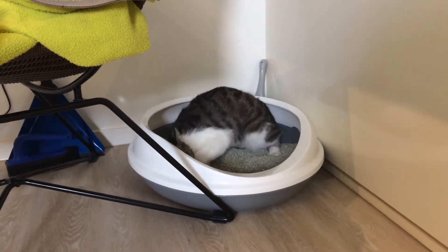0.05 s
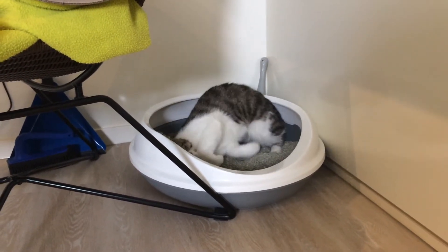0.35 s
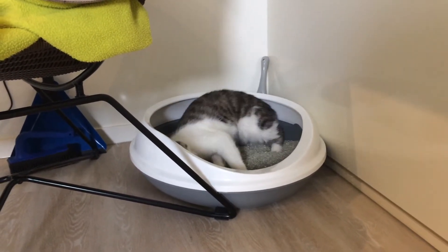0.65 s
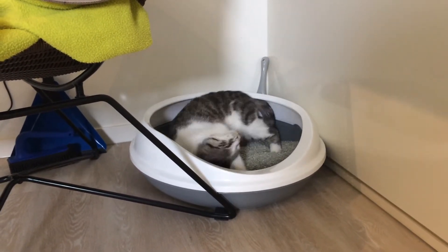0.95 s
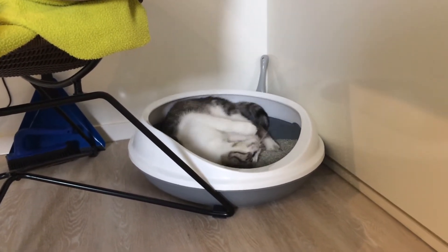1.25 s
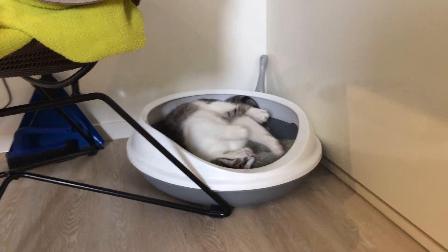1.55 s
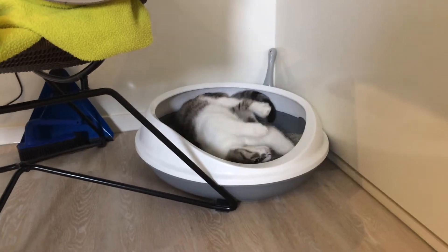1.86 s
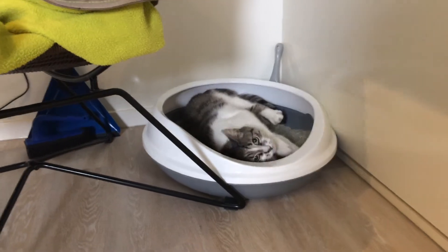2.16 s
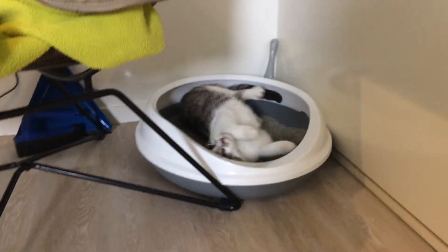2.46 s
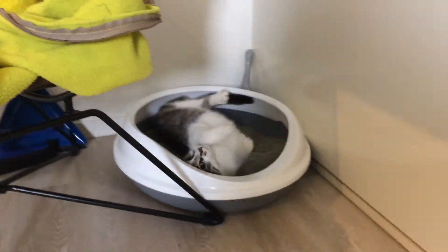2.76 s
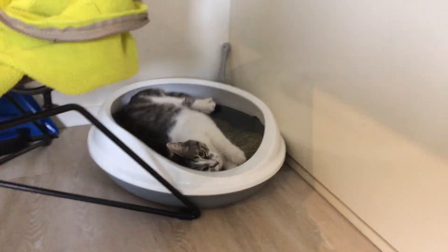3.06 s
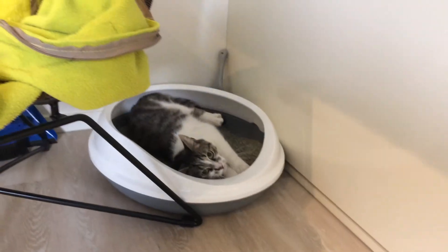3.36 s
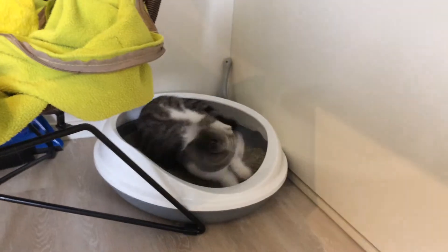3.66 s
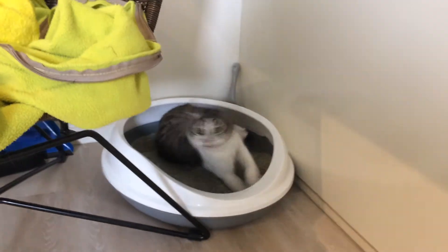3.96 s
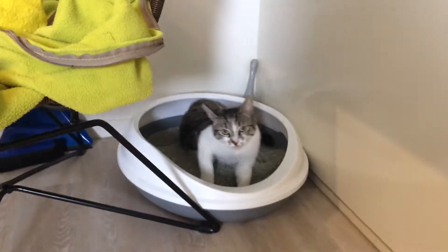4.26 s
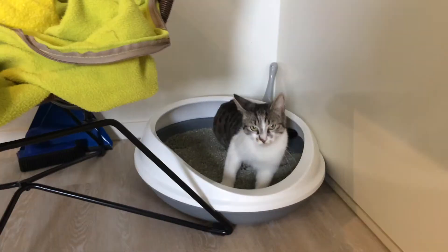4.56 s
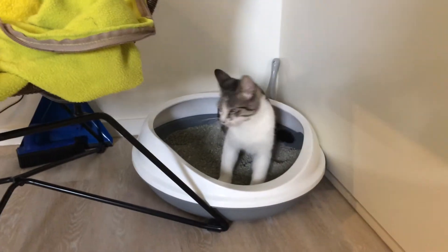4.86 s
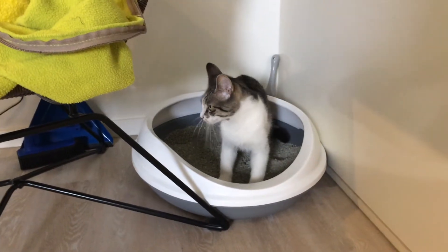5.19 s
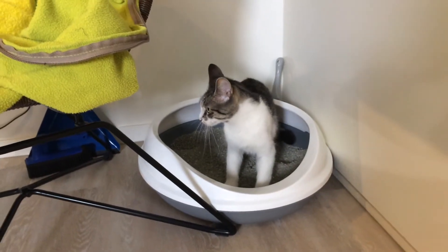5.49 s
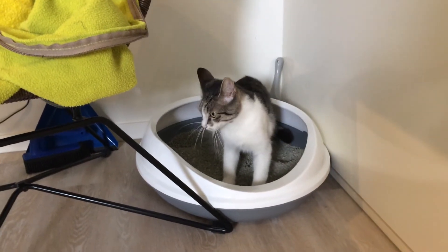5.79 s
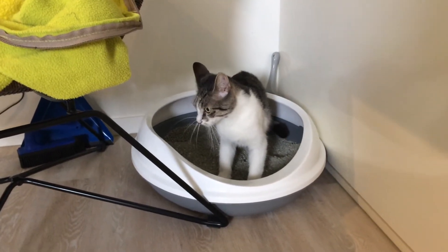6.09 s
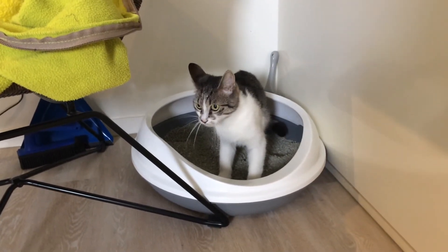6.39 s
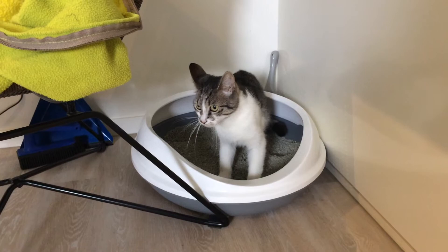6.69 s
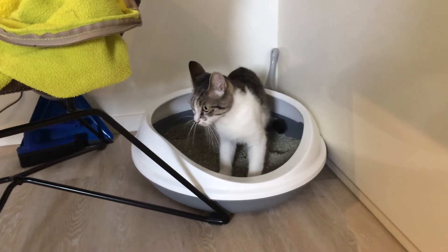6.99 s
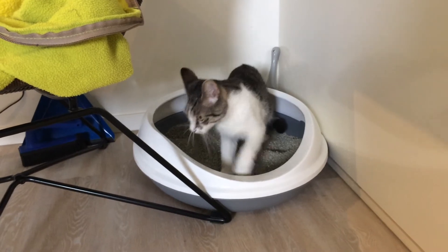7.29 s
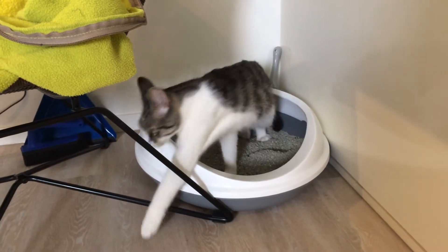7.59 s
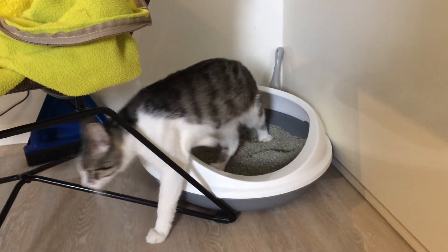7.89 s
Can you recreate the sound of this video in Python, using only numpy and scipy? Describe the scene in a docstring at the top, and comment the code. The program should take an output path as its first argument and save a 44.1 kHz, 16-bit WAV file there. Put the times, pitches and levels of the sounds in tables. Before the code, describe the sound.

A cat moves in a plastic litter tray in a quiet room with a short echo and a faint low rumble. From about 0.2 to 0.6 seconds, granules crunch and spray brightly, with paw scuffs and two sharp ticks on the plastic. Softer, uneven rustling and scattered ticks follow as the cat rolls about. Around 2.5 seconds the tray rocks against the floor with low, hollow thumps. A short scrape and a sharp tick come at 3.2 seconds. The heaviest thumps fall near 3.8 seconds, followed by strong gritty scraping and a softer bump, fading by about 5 seconds. The room is then almost still, with a few very faint, thin twitters like a distant bird between 5 and 7 seconds, and tiny pings near 5.3 and 7.2 seconds. From 7.4 to 8 seconds the cat steps out with light crunches, scuffs, ticks and faint bumps.

```python
"""A cat rolls about in a plastic litter tray in a quiet room, sits up, waits and steps out.
Each push grinds granules under its body and sprays them off its paws; a few flick against the plastic.
Paws scuff and claws tick on the tray, and the cat's weight rocks it so that it thumps on the floor.
Behind this are a few faint pings, thin high twitters, a short echo and the room's low rumble."""
import sys
import numpy as np
from scipy import signal
from scipy.fft import rfft, irfft, next_fast_len
from scipy.io import wavfile

SR = 44100
rng = np.random.default_rng(int(sys.argv[2]) if len(sys.argv) > 2 else 0)


def store_wav(level_fs):
    """Save 16-bit WAV to argv[1]."""
    pcm = np.round(np.clip(np.atleast_2d(level_fs), -1, 1) * 32767)
    wavfile.write(sys.argv[1], SR, pcm.T.astype(np.int16))


N = 350154
TIME = np.arange(N) / SR


def litter():
    """Granules grind and spray in small slips; harder pushes make more collisions and sound the tray."""
    # The tone of each part of the rustle. Each row: pitch in Hz, relative level in dB.
    grind_tone = [(300, -17), (700, -18.5), (1050, -16), (1400, -8), (1900, -3), (3000, -3.5), (5000, -5.5),
                  (6500, -10), (9000, -20.5), (15000, -35)]
    spray_tone = [(1500, -12), (3500, -3.5), (6000, -1), (7500, -3), (10000, -5.5), (13000, -8.5),
                  (15500, -11.5)]
    press_tone = [(60, -4.5), (130, -2.5), (200, -10), (280, -5), (400, 1), (560, -2.5), (800, -4),
                  (1050, -6.5), (1500, -9.5), (2500, -10.5), (6000, -30.5)]
    grind_db, spray_db, press_db = 10 * np.log10(cat_pushes())
    usual_grind_db = -58
    slips = from_db(0.43 * drift(rate=88))
    collisions = grains(per_s=7000 * from_db(0.55 * (grind_db - usual_grind_db)), spread_db=3.0)
    crunch = rng.standard_normal((3, N)) * collisions
    grind = from_db(0.3) * coloured(crunch[0], grind_tone)
    grind += from_db(-8) * clinks(per_s=450, spread_db=3.5, cycles=32)
    spray = from_db(spray_db + 5.0) * coloured(crunch[1], spray_tone)
    press = from_db(press_db - 1.53 + 2.0 * drift(rate=25)) * coloured(crunch[2], press_tone)
    return slips * (from_db(grind_db) * grind + spray + press) + flung_granules(spray_db)


def cat_pushes():
    """The power of grinding, spray and pressure on the tray: each push swells and fades."""
    # Pushes of a paw or flank. Each row: peak time, rise and fall in seconds, grinding level in dB,
    # then spray and pressure in dB compared with the grinding.
    pushes = [(0.219, 0.073, .077, -42.5, -10, -8), (0.295, 0.027, 0.033, -53, -12, 9),
              (0.35, 0.0039, 0.051, -39, -6, -10), (0.381, 0.027, 0.08, -46, 7.5, 1),
              (0.45, 0.019, 0.11, -41, 2.5, -7.5), (0.755, 0.032, 0.17, -61.5, -9.5, 4.5),
              (1.0, 0.12, 0.14, -63.5, -12, 7), (1.13, 0.12, 0.072, -62, -2, -1),
              (1.392, 0.091, 0.043, -54, -4.5, 2.5), (1.59, 0.11, 0.097, -52, -9.5, -1.5),
              (1.855, 0.057, 0.3, -55, -6, -1.5), (2.005, 0.057, 0.052, -52.5, -8.5, -8),
              (2.47, 0.032, 0.081, -61.5, -14, 3.5), (2.575, 0.06, 0.059, -59, -8, -1),
              (2.944, 0.079, 0.08, -61, -8, 0), (3.146, 0.043, .05, -47.5, -17, -3.5),
              (3.184, 0.063, 0.083, -54.5, 5.5, -0.5), (3.695, 0.042, 0.25, -65.5, -7.5, 4),
              (3.845, 0.055, 0.037, -53, -7.5, -1.5), (3.93, 0.016, 0.069, -41, 0, -4.5),
              (4.055, 0.065, 0.051, -45.5, -2, -5.5), (4.212, 0.073, 0.048, -45, -12, -3.5),
              (4.248, 0.06, 0.058, -48, -13.5, -1), (4.527, 0.095, 0.043, -55, -9, 7.5),
              (4.59, 0.47, 0.14, -65.5, -9, 7.5), (5.095, 0.15, 0.12, -75.5, -25, 6),
              (7.39, 0.038, .06, -76, -5, 6.5), (7.56, 0.092, 0.19, -66, -26, 3),
              (7.64, 0.032, 0.21, -71.5, -6, 10.5), (7.882, 0.016, 0.03, -59.5, -25, -3)]
    # While the cat lies wriggling, its weight keeps the litter creeping.
    wriggle_db, wriggle_end_s, fade_s = -69.5, 2.95, 0.34
    wriggle = from_db(wriggle_db) * np.clip((wriggle_end_s - TIME) / fade_s, 0, 1)
    grind = wriggle ** 2 + 1e-12
    spray, press = grind * from_db(-5) ** 2, grind * from_db(5.5) ** 2
    for s, rise_s, fall_s, grind_db, spray_db, press_db in pushes:
        near = slice(*np.searchsorted(TIME, [s - 4 * rise_s, s + 6 * fall_s]))
        before, after = np.maximum(s - TIME[near], 0), np.maximum(TIME[near] - s, 0)
        # A power of 1 would give a pointed top, 2 a bell shape.
        drop_db = 11 * ((before / rise_s) ** 1.29 + (after / fall_s) ** 1.17)
        grind[near] += from_db(grind_db - drop_db) ** 2
        # Spray comes and goes faster than the grinding, pressure more slowly.
        spray[near] += from_db(grind_db + spray_db - 1.17 * drop_db) ** 2
        press[near] += from_db(grind_db + press_db - 0.62 * drop_db) ** 2
    return grind, spray, press


def grains(per_s, spread_db):
    """The jumpy loudness of granules colliding at random: many tiny crunches, a few large."""
    sizes = from_db(spread_db * np.minimum(rng.exponential(1, N), 5))
    chance = np.clip(per_s / SR, 1e-4, 1)
    hits = sizes ** 2 * (rng.random(N) < chance) / chance
    energy = die_away(hits, fade_s=0.0019)
    return np.sqrt(energy / energy.mean())


def clinks(per_s, spread_db, cycles):
    """Larger granules ring briefly as they knock together, each at its own pitch."""
    age = TIME[:SR // 100]
    when, pitch, loudness = rng.random((round(per_s * N / SR), 3)).T[:, :, None]
    hz = 1400 * 6 ** pitch
    strength = from_db(spread_db * np.minimum(-np.log(1 - loudness), 4))
    rings = strength * np.sin(2 * np.pi * hz * age) * np.exp(-np.log(1000) * age * hz / cycles)
    at = (when * N).astype(int) + np.arange(len(age))
    return rms_one(np.bincount(at.ravel(), rings.ravel(), N)[:N])


def flung_granules(spray_db):
    """Single granules hit the plastic with tiny bright cracks; a stronger spray flings more, harder."""
    usual_spray_db, usual_hits_per_s = -60, 35
    extra_db = spray_db - usual_spray_db
    lands = rng.random(N) < usual_hits_per_s * from_db(0.49 * extra_db) / SR
    sizes = from_db(-50 + extra_db + 4.5 * np.minimum(rng.exponential(1, N), 2))
    cracks = die_away(lands * sizes, fade_s=0.0005) * rng.standard_normal(N)
    return butter(cracks, 8400, "high")


def tray_bumps():
    """The tray hits the floor with a padded blow and rings; it may rock back with a softer one."""
    # Each row: start in seconds, relative level in dB, treble limit in Hz, rebounds (rounded to 0 or 1).
    bumps = [(0.975, -66, 190, 0.91), (1.384, -59, 200, 0), (2.503, -50.5, 170, 0), (2.549, -28.5, 580, 1),
             (2.638, -31.5, 165, 1), (3.199, -58.5, 171, 0), (3.744, -27, 162, 0), (3.778, -23.5, 114, 0),
             (3.864, -35.5, 90, 0.91), (4.299, -38.5, 175, 0.58), (4.419, -53, 142, 1),
             (5.912, -63, 129, 0.66), (7.401, -58, 131, 1), (7.485, -55.5, 130, 0), (7.548, -61, 160, 0)]
    # The loaded tray's own notes. Each row: pitch in Hz, relative level in dB, ring time in seconds.
    notes = [(49, -8.5, 0.67), (61.6, -13.5, 0.58), (82.4, -3.5, 0.25), (101.7, 5, 0.31), (142.3, 5, 0.11),
             (166.2, -0.5, 0.33), (250.8, -8, 0.49), (278.3, -4, 0.27), (291, -4.5, 0.19),
             (371.5, -2.5, 0.14), (505, -9.5, 0.21), (576, -24.5, 0.47), (650, -16, 0.48), (820, -23, 0.84),
             (890, -11, 0.16), (1010, -29, 0.19)]
    rebound_s, loss_db, softening = 0.0447, 4.5, 0.54
    blows = np.zeros(N)
    for s, level_db, limit_hz, rebounds in bumps:
        for k in range(round(rebounds) + 1):
            at = round((s + k * rebound_s) * SR)
            blow = butter(signal.unit_impulse(2048), limit_hz * softening ** k, "low")
            blows[at:at + len(blow)] += from_db(level_db - k * loss_db) * blow
    body = sum(from_db(db) * ring(blows, hz, t60) * (-1) ** k for k, (hz, db, t60) in enumerate(notes))
    # The load of litter shudders after the blow.
    shudder = butter(reflections(blows, t60=0.47, delay=0.0031), [120, 2500], "band")
    return body + from_db(35) * shudder


def scuffs():
    """Paws and flank rub through to the plastic, which rings in answer."""
    # Each row: middle in seconds, length in seconds, level in dB, pitch in Hz.
    rubs = [(0.229, 0.077, -49, 2200), (.30, 0.024, -48, 1020), (.35, 0.11, -47, 1710),
            (0.4, 0.031, -46.5, 785), (0.45, 0.01, -41.5, 615), (.755, 0.028, -55.5, 670),
            (1.385, 0.032, -50, 845), (2.035, 0.09, -53.5, 2040), (3.15, 0.022, -55, 527),
            (3.932, 0.022, -51, 540), (3.978, 0.048, -53, 780), (4.045, 0.013, -43, 543),
            (4.246, 0.017, -49, 1650), (4.364, 0.016, -51.5, 3330), (7.389, 0.022, -66.5, 2050),
            (7.485, 0.031, -64, 900), (7.524, 0.023, -57, 2000), (7.644, 0.068, -60.5, 970)]
    return swells(rubs, width=0.24)


def ticks():
    """Granules and claws tap the tray: a sharp crack, then a short buzz of the plastic."""
    # Each row: start in seconds, peak level in dB, pitch in Hz.
    taps = [(.349, -30, 4470), (.579, -28.5, 4850), (0.705, -40.5, 750), (.767, -47, 9000),
            (1.122, -39, 4580), (1.999, -36, 2240), (2.569, -45, 10000), (2.59, -42.5, 7040),
            (2.769, -42, 4830), (2.788, -44, 4350), (2.853, -47, 4630), (3.2025, -29, 9000),
            (3.781, -45.5, 8500), (3.923, -44, 5030), (7.163, -61, 1420), (7.628, -48, 5000),
            (7.790, -43.5, 3170), (7.871, -49, 2400)]
    out, age = np.zeros(N), TIME[:SR // 20]
    for (s, peak_db, hz), noise in zip(taps, rng.standard_normal((len(taps), len(age)))):
        crack, buzz = np.exp(-age / 0.00078), 0.3 * np.exp(-age / 0.017)
        tick = butter(noise * (crack + buzz), hz * np.sqrt([.5, 2]), "band", order=1)
        tick = butter(tick, 2 * hz, "low", order=1)   # duller taps carry less treble
        at = round(s * SR)
        out[at:at + len(age)] += from_db(peak_db) * tick / np.abs(tick).max()
    return out


def pings():
    """Something small is touched lightly and rings on for a moment."""
    # Each row: start in seconds, level in dB, pitch in Hz, ring time in seconds.
    touches = [(5.255, -73, 1220, .3), (7.16, -64, 1320, .33), (7.162, -68, 1425, .38)]
    return sum(from_db(db) * ring(signal.unit_impulse(N, round(s * SR)), hz, t60)
               for s, db, hz, t60 in touches)


def twitters():
    """The same thin, distant note now and then, perhaps a bird outside."""
    # Each entry: the middle of a note in seconds.
    times = [4.94, 5.221, 5.86, 6.011, 6.94, 7.18]
    length_s, level_db, hz = 0.05, -81, 5720
    return swells([(s, length_s, level_db, hz) for s in times], width=0.14)


def room_rumble():
    """The still room: a faint steady noise, with a low part that wavers."""
    # Each row: pitch in Hz, relative level in dB.
    room_tone = [(15, -30), (25, -21), (86, -4), (151, -3.5), (252, -7), (388, -12.5), (612, -15),
                 (664, -16), (719, -14.5), (823, -17), (1370, -23), (2680, -26), (4020, -29), (5550, -29.5),
                 (15400, -37.5)]
    steady = from_db(-65.5) * coloured(rng.standard_normal(N), room_tone)
    waver = from_db(-78.5 + 6.8 * drift(rate=7))
    return steady + waver * rms_one(butter(rng.standard_normal(N), [90, 200], "band"))


def reflections(x, t60, delay):
    """Dense echoes that start after delay seconds and fade by 60 dB in t60 seconds."""
    age = TIME[:SR // 2]
    tail = rng.standard_normal(len(age)) * from_db(-60 * age / t60) * (age > delay)
    return signal.fftconvolve(x, tail / np.sqrt(np.sum(tail ** 2)))[:N]


def swells(rows, width):
    """Brief rushes of noise around one pitch; width is their spread as a share of that pitch."""
    out, age = np.zeros(N), TIME[:SR // 4]
    middle = age.mean()
    for (s, length_s, db, hz), noise in zip(rows, rng.standard_normal((len(rows), len(age)))):
        band = rms_one(butter(noise, [hz * (1 - width / 2), hz * (1 + width / 2)], "band", order=1))
        at = round((s - middle) * SR)
        out[at:at + len(age)] += from_db(db) * band * np.exp(-2 * ((age - middle) / length_s) ** 2)
    return out


def ring(clicks, hz, t60):
    """Each click starts a pure note that fades by 60 dB in t60 seconds."""
    decay, step = from_db(-60 / (t60 * SR)), 2 * np.pi * hz / SR
    return signal.lfilter([0, np.sin(step)], [1, -2 * decay * np.cos(step), decay ** 2], clicks + 1e-18)


def die_away(hits, fade_s):
    """Give each hit a tail that falls to about a third in fade_s seconds."""
    return signal.lfilter([1], [1, -np.exp(-1 / (fade_s * SR))], hits + 1e-18)


def coloured(x, tone):
    """Shape a noise with a tone table and scale it to an average power of 1."""
    size = next_fast_len(N)
    hz, db = np.transpose(tone)
    bins = np.maximum(np.arange(size // 2 + 1) * SR / size, 1)
    gain = from_db(np.interp(np.log(bins), np.log(hz), db))
    gain *= np.minimum(bins / hz[0], 1) ** 2   # fade out below the lowest row
    return rms_one(irfft(rfft(x, size) * gain, size)[:N])


def drift(rate):
    """A smooth random wobble that changes about rate times a second."""
    return rms_one(butter(rng.standard_normal(N), rate / 2, "low"))


def butter(x, hz, kind, order=2):
    """A filter that keeps the lows, the highs or a band between two pitches."""
    sections = signal.butter(order, np.clip(hz, 10, .45 * SR), kind, fs=SR, output="sos")
    return signal.sosfilt(sections, x + 1e-18)


def rms_one(x):
    """Scale to an average power of 1."""
    return x / np.sqrt(np.mean(x ** 2) + 1e-20)


def from_db(db):
    """Turn decibels into a number to multiply by."""
    return 10 ** (np.asarray(db) / 20)


def scene():
    """The cat in its tray in a corner, with the room's short echo and faint background."""
    crisp = litter() + scuffs() + ticks() + pings()
    thuds = tray_bumps()
    echo = from_db(-7.5) * butter(reflections(crisp, t60=0.16, delay=0.0049), 6000, "low", order=1)
    echo += from_db(-17) * reflections(thuds, t60=0.4, delay=0.015)
    return (crisp + thuds + echo + room_rumble() + twitters())[None]


def record(dry):
    """The microphone drops the deepest bass; the highest treble is cut steeply."""
    bass_hz, treble_hz = 22, 15400
    thin = butter(dry, bass_hz, "high")
    return signal.sosfilt(signal.ellip(12, .1, 80, treble_hz, fs=SR, output="sos"), thin)


dry = scene()
out = record(dry)
store_wav(out)
```